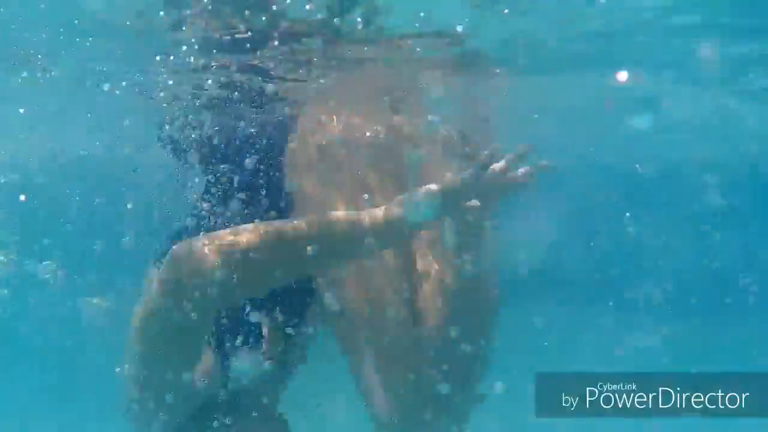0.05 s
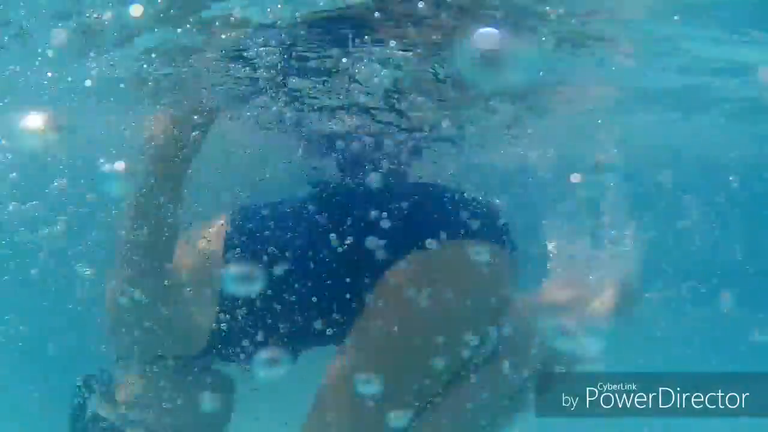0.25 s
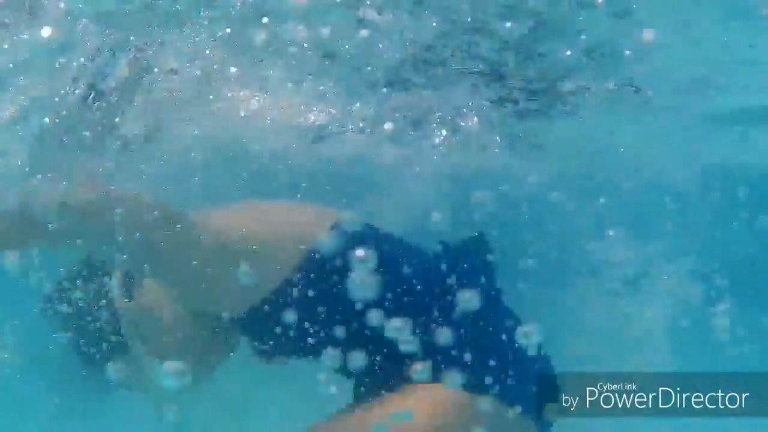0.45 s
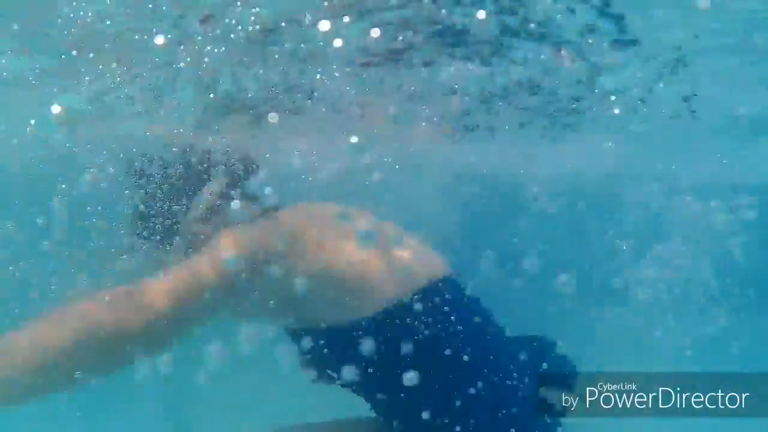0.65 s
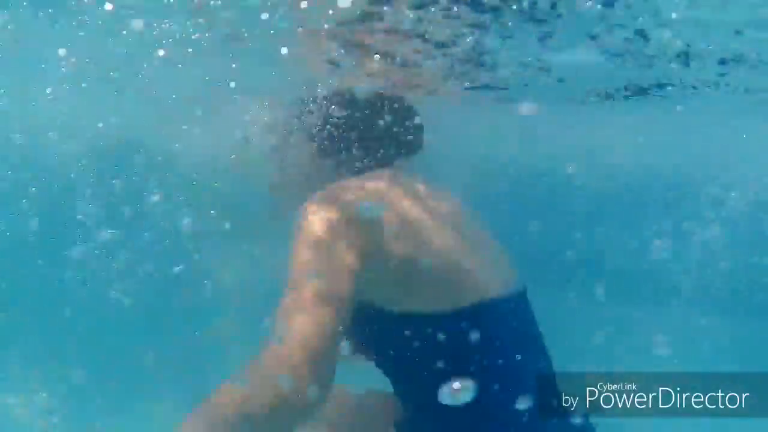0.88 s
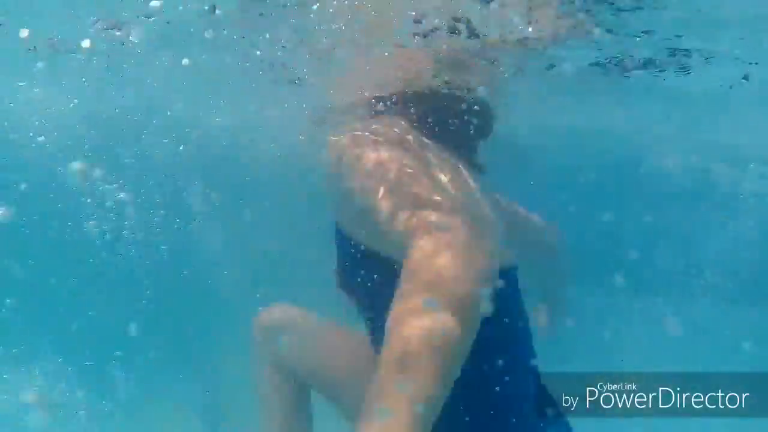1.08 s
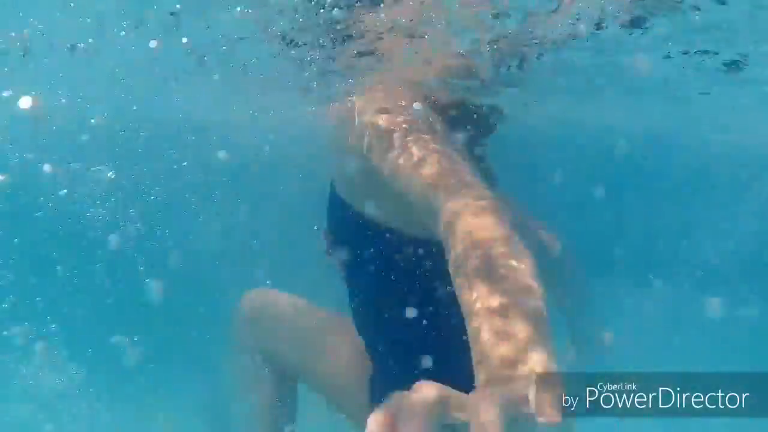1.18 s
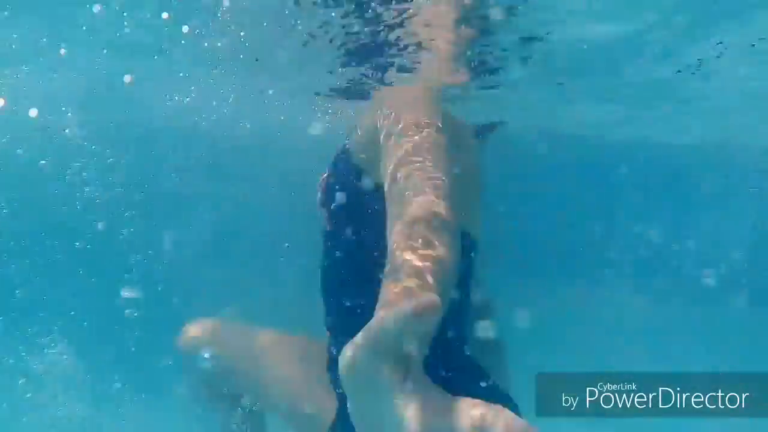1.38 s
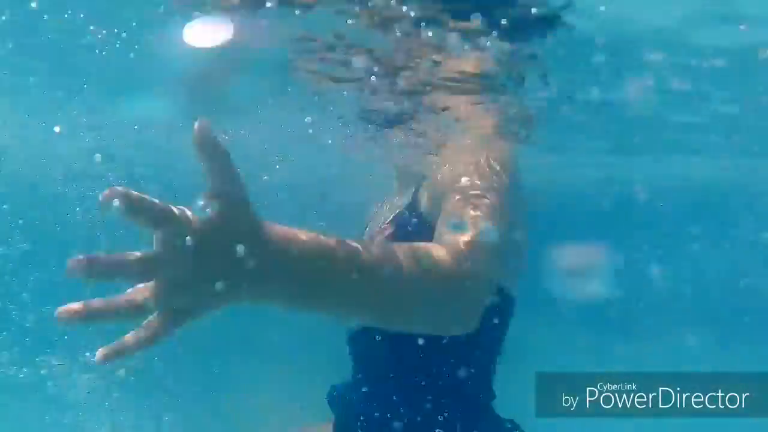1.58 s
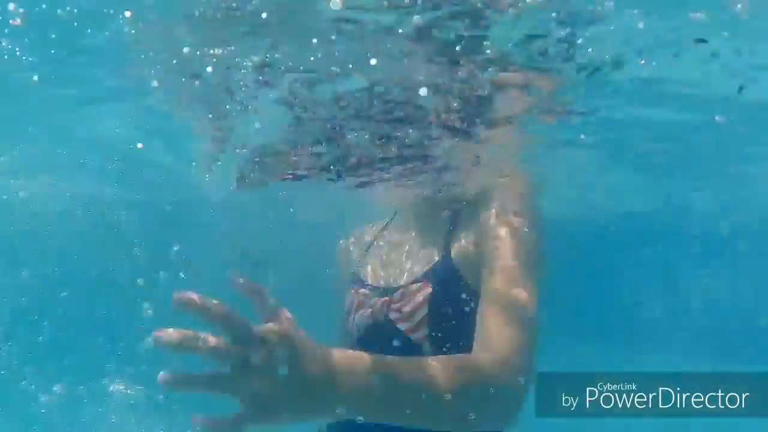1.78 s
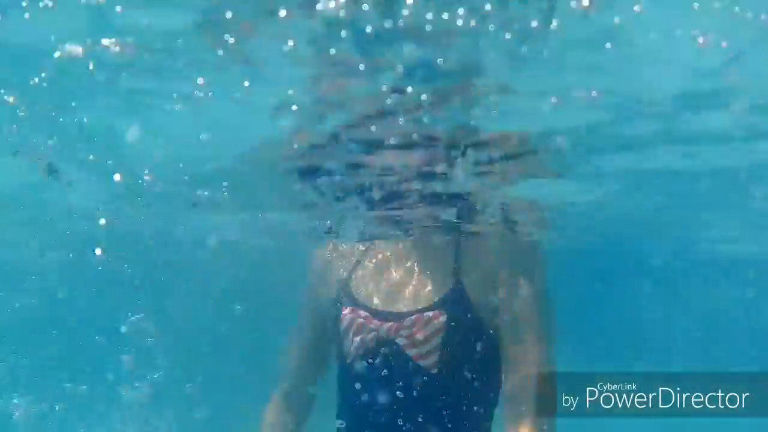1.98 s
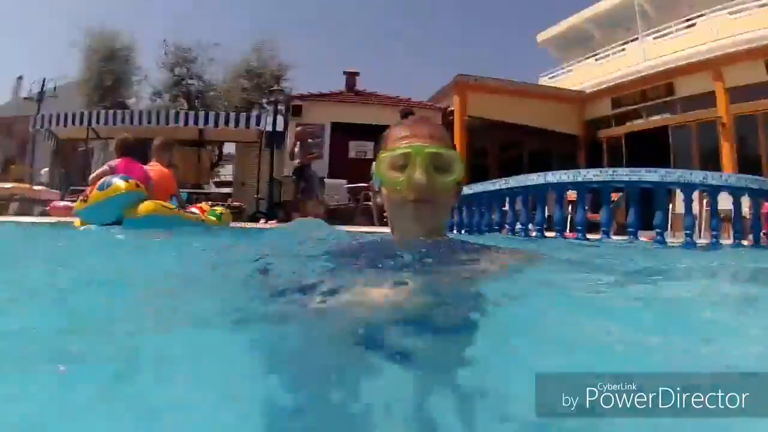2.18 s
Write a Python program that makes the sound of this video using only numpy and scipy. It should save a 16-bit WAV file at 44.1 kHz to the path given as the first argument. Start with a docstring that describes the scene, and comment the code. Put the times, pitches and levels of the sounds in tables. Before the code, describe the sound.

Muffled underwater gurgling from a swimmer's strokes, with two deep overloaded booms, fading to sparse bubbles

```python
"""Under the surface of a pool, a swimmer thrashes close to a microphone in a waterproof case.
Clouds of damped, rising bubble tones gurgle and thin out; big air pockets boom and overload the microphone.
Foam fizzes, spray patters and drops tick as clusters of higher bubble tones; water nudges the case with
heavily damped low pulses. Filtered noise gives a low rumble, a faint hiss and the rasp of the overload.
"""
import sys
import numpy as np
from scipy import signal
from scipy.fft import rfft, irfft, next_fast_len
from scipy.io import wavfile
from scipy.ndimage import uniform_filter1d, map_coordinates

SR = 44100
rng = np.random.default_rng(int(sys.argv[2]) if len(sys.argv) > 2 else 0)


def dump(signal):
    """Clip the signal to [-1, 1] and save it as 16-bit WAV at the path in sys.argv[1]."""
    limited = np.clip(np.atleast_2d(signal).T, -1, 1)
    pcm = np.round(limited * 32767).astype(np.int16)
    wavfile.write(sys.argv[1], SR, pcm)


N = 99225  # length [samples]
SWELL_CYCLES = 1.47  # onset of a small bubble's tone [cycles]
TICK_SWELL_S = 0.0015  # onset of a drop's tone [s]


def amp(db):
    """Decibel law: 20 dB is a factor of ten in amplitude."""
    return 10 ** (np.asarray(db) / 20)


def unit(x):
    """Normalisation to a root-mean-square of 1."""
    return x / np.sqrt(np.mean(x ** 2) + 1e-20)


def curve(rows, axis=1):
    """Linear interpolation: one column of a table, one value per sample."""
    columns = np.transpose(rows)
    return np.interp(np.arange(N) / SR, columns[0], columns[axis])


def coloured(x, points):
    """Minimum-phase filtering: a folded cepstrum makes a causal filter from (frequency [Hz], gain [dB])."""
    m = 2 * next_fast_len(N)
    hz, db = np.transpose(points)
    log_bins = np.log(np.fft.rfftfreq(m, 1 / SR) + 1)
    gain = amp(np.interp(log_bins, np.log(hz), db))
    cepstrum = irfft(np.log(gain))
    cepstrum[1:m // 2] *= 2
    cepstrum[m // 2 + 1:] = 0
    response = np.exp(rfft(cepstrum))
    return irfft(rfft(x, m) * response)[:N]


def add(track, s, sound):
    """Superposition: mix a sound into a track from time s [s]."""
    part = track[max(0, round(s * SR)):][:len(sound)]
    part += sound[:len(part)]


def bubble(t, hz, t60, rise, swell):
    """Damped resonance: a pulsing bubble rings as a sine, its pitch climbing by the share rise per t60."""
    decay = np.exp(-np.log(1000) * t / t60)
    onset = 1 - np.exp(-(t / swell) ** 3)
    return decay * onset * np.sin(2 * np.pi * hz * t * (1 + rise * t / t60 / 2))


def cloud(per_s, pitch, spread, cycles, size_db, rise, colour, size):
    """Random superposition: a filtered swarm of bubbles about a pitch curve, evened to a level of 1.

    spread [log ratio] bounds the pitch, cycles is the 60 dB decay, size_db the mean level excess [dB],
    rise the share per decay and size the longest ring [samples].
    """
    u = rng.random((int(per_s * N / SR), 4))
    start = (u[:, :1] * N).astype(int)
    hz = pitch[start] * np.exp(spread * (u[:, 1:2] - u[:, 2:3]))
    strength = amp(-size_db * np.log(1 - u[:, 3:]))
    k = np.arange(size)
    rings = strength * bubble(k / SR, hz, cycles / hz, rise, SWELL_CYCLES / hz)
    swarm = np.bincount(((start + k) % N).ravel(), rings.ravel(), N)  # late rings wrap to the start
    x = coloured(swarm, colour)
    power = uniform_filter1d(uniform_filter1d(x * x, size=1800), size=1800)
    return x / np.sqrt(np.abs(power) + 1e-12)


def background():
    """Broadband noise: a low rumble of moving water that varies, and steady microphone hiss."""
    # relative spectrum of the pool's low murmur: (frequency [Hz], density [dB per Hz])
    rumble_colour = [(10, -11.5), (22, 3.5), (45, -16), (80, -8), (105, -17), (135, -6), (180, -10),
                     (220, -11.5), (400, -14.5), (700, -24), (1500, -56)]
    # level of the murmur: (time [s], level [dB])
    rumble_level = [(0, -38.5), (.4, -31.5), (.8, -35.5), (1.5, -40), (2.25, -40)]
    # relative spectrum of the hiss: (frequency [Hz], density [dB per Hz])
    hiss_colour = [(100, 7.5), (1000, -7), (2000, -2), (4200, -5), (8000, -9), (12000, -11), (15000, -14)]
    rumble = amp(curve(rumble_level)) * unit(coloured(rng.standard_normal(N), rumble_colour))
    hiss = amp(-50.5) * unit(coloured(rng.standard_normal(N), hiss_colour))
    return rumble + hiss


def near_bubbles():
    """Bubble resonance: single bubbles pinch off near the case, each climbing in pitch as it rises."""
    # single near bubbles: (time [s], pitch [Hz], level [dB], t60 [s])
    bubble_rows = [(0, 519, -13, 0.058), (.009, 745, -11, 0.028), (.011, 1164, -21.5, 0.059),
                   (.034, 760, -20, 0.14), (.0635, 830, -17, 0.092), (.064, 586, -18, 0.083),
                   (.083, 550, -12, 0.058), (.088, 777, -24, 0.36), (.136, 670, -3, 0.036),
                   (.137, 1314, -25, 0.061), (.149, 570, -11, 0.062), (.1673, 646, -11.5, .08),
                   (.1905, 621, -16, 0.15), (.219, 614, -7.5, 0.043), (.2245, 747, -7.5, 0.058),
                   (.257, 1327, -39.5, 0.22), (.272, 691, -17, 0.36), (.306, 708.5, -9.5, 0.1),
                   (.311, 378.4, -16, 0.24), (.3481, 786.4, -15, 0.19), (.3695, 554.6, -10, 0.11),
                   (.407, 733, -11, .04), (.409, 1003, -23.5, 0.24), (.431, 642, -6, 0.038),
                   (.451, 562, -20.5, 0.28), (.482, 1037, -21, 0.17), (.5, 754, -16.5, 0.18),
                   (0.5132, 912, -5.5, 0.041), (.5155, 578.5, -14.5, 0.15), (.537, 652, -10, 0.078),
                   (.564, 982, -19.5, 0.11), (.567, 902, -15, 0.042), (.594, 597, -21, .07),
                   (.614, 436, -18, 0.059), (.6623, 649.7, -18.5, 0.26), (.664, 530, -15.5, 0.052),
                   (0.661, 1020, -28, 0.097), (.711, 1013, -24, 0.1), (.7166, 660, -26, 0.2),
                   (.775, 550, -19, 0.061), (.883, 530, -17.5, 0.18), (.894, 691, -18.5, 0.15),
                   (.93, 1353, -32, .1), (.9549, 575, -15, 0.06), (.979, 586, -11.5, 0.088),
                   (0.9801, 944, -14, 0.042), (1.0125, 505, -16, 0.16), (1.046, 503.4, -10, 0.069),
                   (1.046, 940, -24, 0.036), (1.063, 495, -10.5, 0.053), (1.072, 491, -8, 0.039),
                   (1.1335, 478, -19, 0.076), (1.168, 394, -25.5, 0.067), (1.222, 582, -23.5, 0.027),
                   (1.292, 512, -33, 0.11), (1.36, 530, -19.5, 0.025), (1.383, 340, -24, 0.067),
                   (1.42, 473, -20.5, 0.06), (1.4399, 458, -12.5, 0.044), (1.6363, 411, -22.5, 0.054),
                   (1.74, 531, -24.5, .093), (2.004, 635, -30, 0.059), (2.034, 550, -15.5, 0.015)]
    out, t = np.zeros(N), np.arange(SR // 4) / SR
    rises = 0.097 * rng.uniform(1.0, 2.5, len(bubble_rows))  # share per t60
    for (s, hz, db, t60), rise in zip(bubble_rows, rises):
        add(out, s, amp(db) * bubble(t, hz, t60, rise, SWELL_CYCLES / hz))
    return out


def churn():
    """Entrained air: arms and legs beat bubbles into the water, in a gurgle of changing level and pitch."""
    # churned water: (time [s], level [dB], typical bubble pitch [Hz])
    churn_rows = [(0, -28.5, 688), (.12, -31, 713), (.2, -24.5, 689), (.3, -26, 715), (.42, -20.5, 737),
                  (.5, -24.5, 815), (.57, -23, 691), (.68, -29.5, 683), (.8, -34.5, 567), (.92, -28.5, 580),
                  (1.07, -29, 562.5), (1.1, -38, 541), (1.16, -32, 483), (1.27, -40, 466), (1.41, -36, 439),
                  (1.52, -40, 478), (1.75, -40, 476), (2.25, -49, 525)]
    # relative passage of the churning through the case: (frequency [Hz], gain [dB])
    case_colour = [(100, -5), (210, 12.5), (290, 0), (400, 4.5), (560, 8.5), (670, 7), (770, -2.5),
                   (900, 4.5), (1050, 3), (1170, -32), (1350, -25), (1700, -27), (3000, -17.5)]
    gurgle = cloud(per_s=600, pitch=curve(churn_rows, axis=2), spread=0.668, cycles=36, size_db=2,
                   rise=0.14, colour=case_colour, size=3000)
    return amp(curve(churn_rows)) * gurgle


def fizz():
    """Small-bubble resonance: the foam left by the strokes seethes with fine, higher-pitched bubbles."""
    # fine bubbles in the foam: (time [s], level [dB])
    foam_level = [(0, -47), (.33, -53.5), (.42, -41), (.56, -46), (.73, -47), (.82, -47.5), (.94, -44),
                  (1.12, -45.5), (1.25, -51.5), (1.8, -54), (2.1, -50), (2.24, -43)]
    # relative colour of the foam: (frequency [Hz], gain [dB])
    foam_colour = [(700, -0.5), (1000, 3.5), (1400, -2), (1700, -1), (2100, -5), (3000, -3), (4200, -17)]
    foam = cloud(per_s=1600, pitch=np.full(N, 1687.5), spread=0.877, cycles=75, size_db=2,
                 rise=0.07, colour=foam_colour, size=1000)
    return amp(curve(foam_level)) * foam


def spray():
    """Random impacts: thrown water patters back on the surface in clumps."""
    # spray raining back: (time [s], level [dB])
    spray_level = [(0, -67), (.37, -68), (.43, -50.5), (.52, -49), (.58, -45), (.7, -55), (.8, -61.5),
                   (1.15, -62), (2.25, -59)]
    # relative colour of the spray: (frequency [Hz], gain [dB])
    spray_colour = [(2000, 0), (3000, -0.5), (3550, -2), (3950, -8), (6000, -28)]
    clumps_per_s, clump_db = 70, 1.4  # random levels per second and their standard deviation [dB]
    place = np.arange(N) * clumps_per_s / SR
    clumps_db = clump_db * map_coordinates(rng.standard_normal(int(place[-1]) + 2), [place])
    patter = cloud(per_s=2000, pitch=np.full(N, 3167), spread=0.19, cycles=30, size_db=4,
                   rise=0, colour=spray_colour, size=600)
    return amp(curve(spray_level) + clumps_db) * patter


def pockets():
    """Large-bubble resonance: big air pockets close with a deep bloop; late on, the pool itself rings faintly
    low."""
    # air dragged under, and late on faint distant low rings of the pool: (time [s], pitch [Hz], level [dB], t60
    # [s], pitch rise [share per t60])
    pocket_rows = [(0.222, 197, 4, 0.021, 0.085), (0.2361, 128.3, -14, 0.16, 0.084),
                   (0.399, 236, -23.5, .15, 0), (0.584, 250, -24.5, 0.19, 0.15),
                   (0.5276, 147.2, 8, 0.17, 0.21), (1.778, 130.7, -36, 0.66, 0.067),
                   (2.07, 133, -26, 0.081, 0.085)]
    out, t = np.zeros(N), np.arange(SR // 2) / SR
    for s, hz, db, t60, rise in pocket_rows:
        add(out, s, amp(db) * bubble(t, hz, t60, rise, swell=0.0062))
    return out


def nudges():
    """Heavy damping: moving water shoves the case, a dull push that dies within a few cycles."""
    # slow pushes on the case: (time [s], pitch [Hz], level before doubling [dB])
    nudge_rows = [(0.354, 123, -23), (0.3625, 62, -22.5), (0.531, 59.2, -6), (0.869, 62, -21.5),
                  (2.005, 39.8, -23.5)]
    out, t = np.zeros(N), np.arange(SR // 5) / SR
    for s, hz, db in nudge_rows:
        push = bubble(t, hz, t60=2.2 / hz, rise=0, swell=0.11 / hz)
        add(out, s, 2 * amp(db) * push)
    return out


def ticks():
    """Clustered resonances: each drop rings one leading bubble and three weaker ones near its pitch."""
    # drops and small bursting bubbles: (time [s], pitch [Hz], level [dB], t60 [s])
    tick_rows = [(0.418, 1675, -35, 0.099), (.506, 1533, -33, 0.14), (0.562, 3160, -29.5, 0.028),
                 (.587, 3300, -32, 0.051), (.615, 3240, -39, 0.027), (0.63, 3010, -35, 0.036),
                 (0.644, 2510, -33.5, 0.022), (0.692, 2550, -36, 0.018), (.696, 3320, -37.5, .035),
                 (.722, 1340, -33, 0.047), (0.774, 2760, -29, 0.02), (0.883, 2850, -26.5, .01),
                 (0.882, 3770, -24, 0.0068), (0.882, 2290, -28.5, 0.014), (.954, 3080, -32, 0.015),
                 (1.103, 2070, -37, 0.093), (1.104, 2810, -34, 0.022), (1.155, 3135, -27, 0.022),
                 (1.197, 3340, -30.5, 0.017), (1.364, 3540, -39, 0.015), (1.467, 2860, -32, 0.032),
                 (1.483, 3510, -36, 0.022), (1.562, 3050, -39, 0.032), (1.58, 1820, -36.5, 0.067),
                 (1.597, 1983, -37.5, 0.049), (1.697, 1094, -39.5, 0.064), (1.707, 2880, -33.5, 0.015),
                 (1.898, 3070, -37, 0.02), (1.969, 2810, -38, 0.028), (1.315, 1090, -42, 0.21),
                 (2.205, 1355, -36, 0.056), (2.227, 1263, -25, 0.035), (2.225, 2230, -21, 0.006),
                 (2.2275, 3470, -8.5, 0.0078)]
    out, t = np.zeros(N), np.arange(SR // 8) / SR
    for s, hz, db, t60 in tick_rows:
        cluster_hz = hz * np.exp(0.05 * rng.standard_normal((3, 1)))
        leader = bubble(t, hz, t60, 0, TICK_SWELL_S)
        cluster = bubble(t, cluster_hz, t60, 0, TICK_SWELL_S).sum(0)
        add(out, s, amp(db) * (leader + 0.21 * cluster))
    return out


def pool(x):
    """Reverberation: convolution with decaying noise adds echoes from the surface and the walls."""
    t60, onset_s, echo_db = 0.15, 0.008, -13  # [s], [s], [dB against the direct sound]
    t = np.arange(SR // 3) / SR
    envelope = np.exp(-np.log(1000) * t / t60) * (1 - np.exp(-t / onset_s))
    tail = rng.standard_normal(len(t)) * envelope
    echoes = signal.fftconvolve(x, tail / np.linalg.norm(tail))[:N]
    return x + amp(echo_db) * echoes


def scene():
    """Superposition of all sources; only the near bubbles and ticks pass through the pool's echoes."""
    echoing = pool(near_bubbles() + ticks())
    mix = background() + echoing + churn() + fizz() + spray() + pockets() + nudges()
    return mix[None]


def record(dry):
    """Saturation: the microphone overloads and rasps as it recovers; a sharp band limit cuts the top."""
    # relative colour of the rasp: (frequency [Hz], gain [dB])
    rasp_colour = [(500, 19), (1500, 22), (3500, 12.5), (4800, 2.5), (7200, -3.5), (11000, -35)]
    recovery_s, rasp_db, top_hz = 0.0018, -19.5, 15450  # [s], [dB against smoothed excess], [Hz]
    clipped = dry / (1 + np.abs(dry) ** 24) ** (1 / 24)
    keep = np.exp(-1 / (recovery_s * SR))
    excess = signal.lfilter([1 - keep], [1, -keep], np.abs(dry - clipped))
    rasp = amp(rasp_db) * excess * unit(coloured(rng.standard_normal(N), rasp_colour))
    m = next_fast_len(N + SR // 2)
    passed = np.fft.rfftfreq(m, 1 / SR) < top_hz
    spectrum = rfft(0.84 * (clipped + rasp), m)  # 0.84 is the output gain
    return irfft(spectrum * passed, m)[:, :N]


dry = scene()
out = record(dry)
dump(out)
```